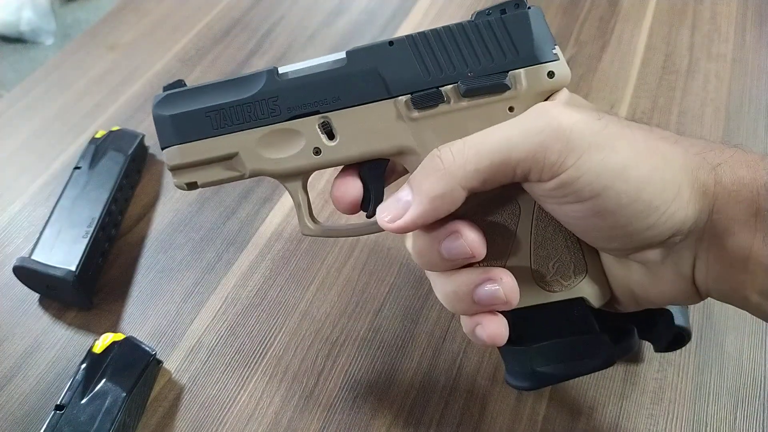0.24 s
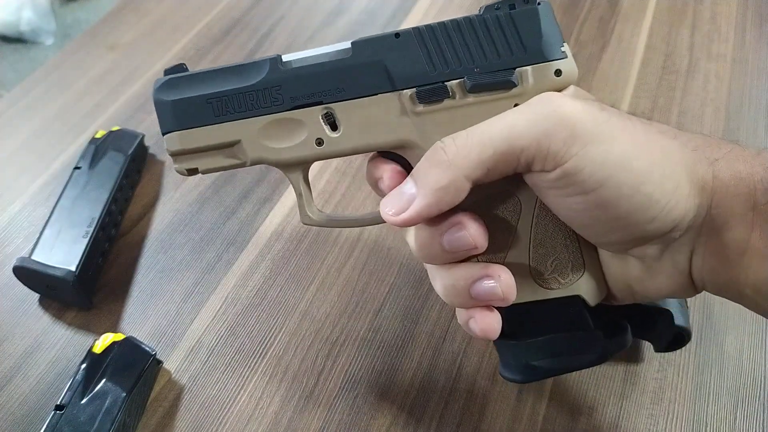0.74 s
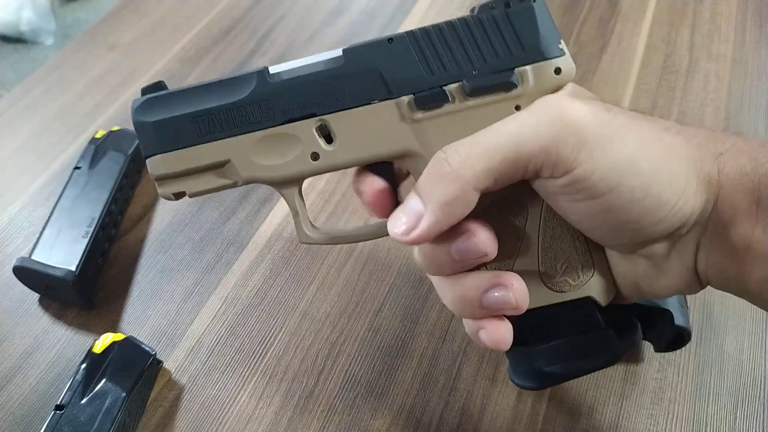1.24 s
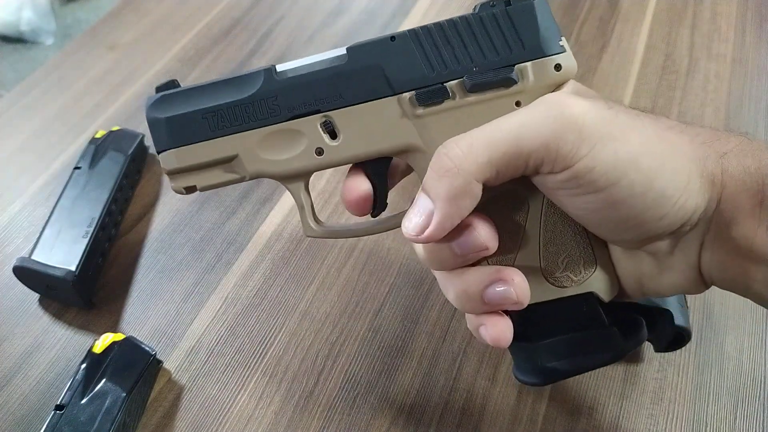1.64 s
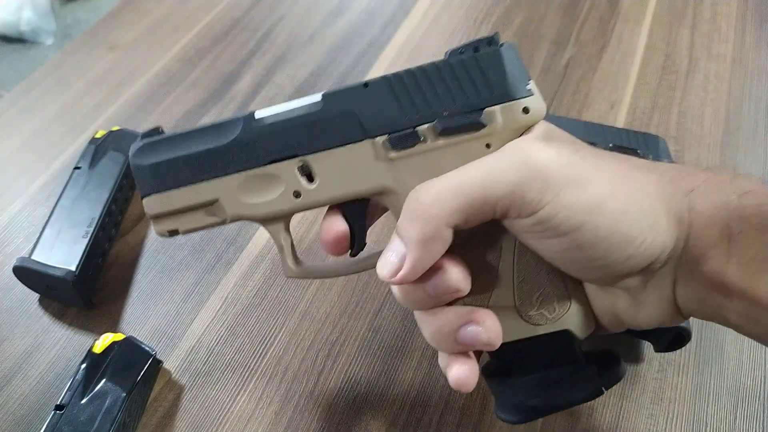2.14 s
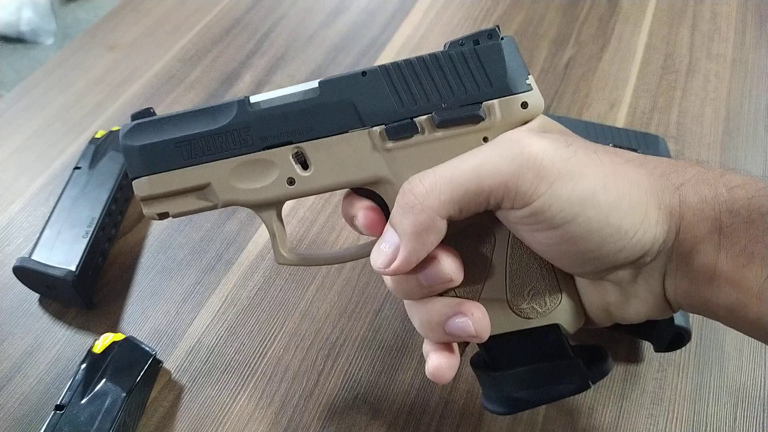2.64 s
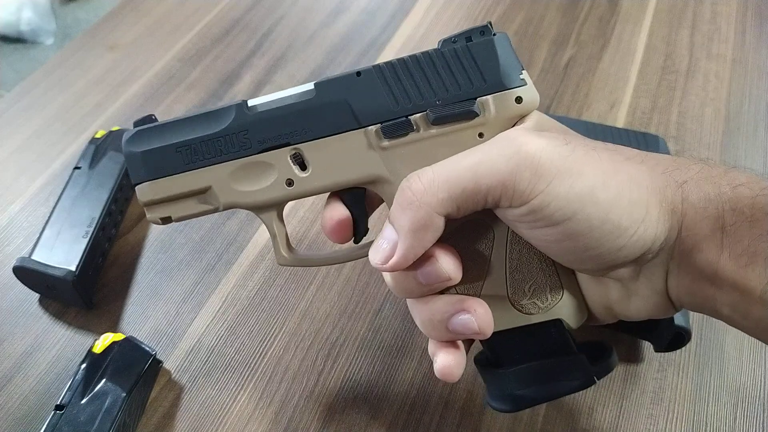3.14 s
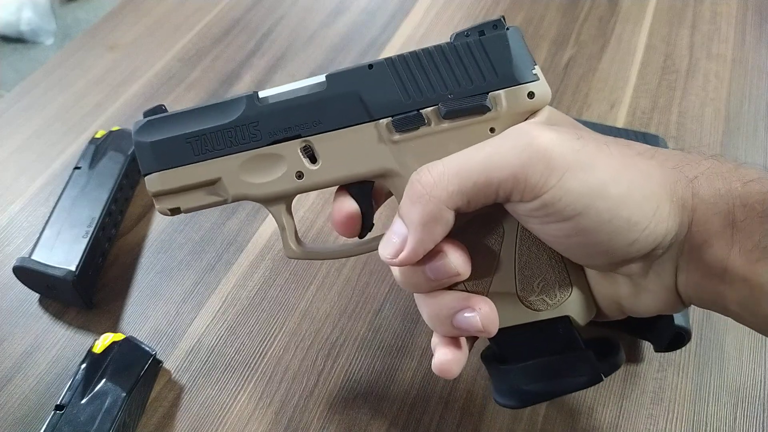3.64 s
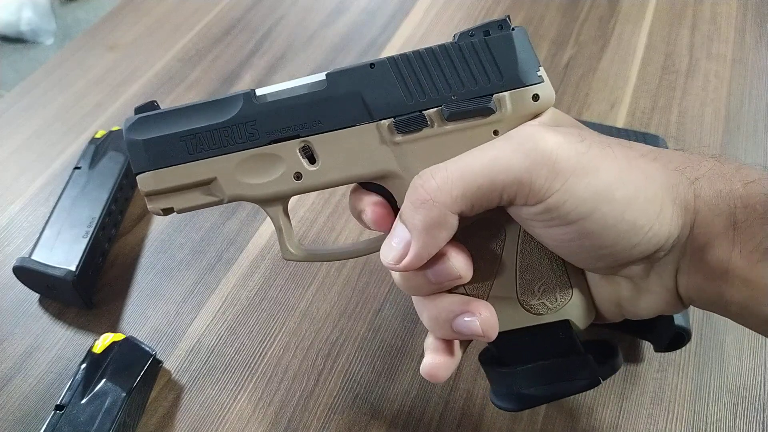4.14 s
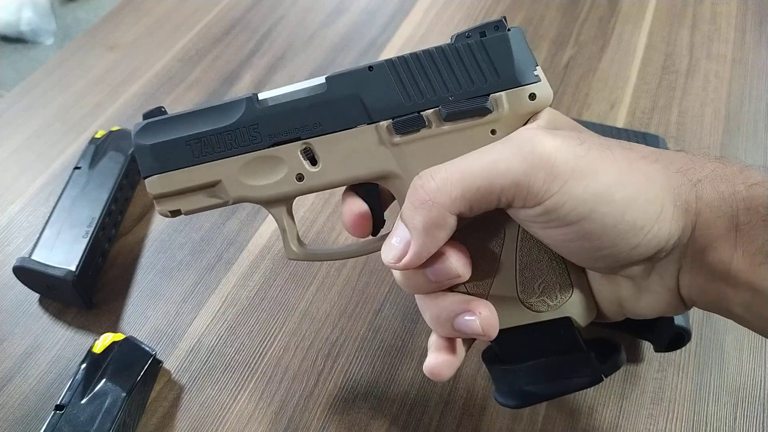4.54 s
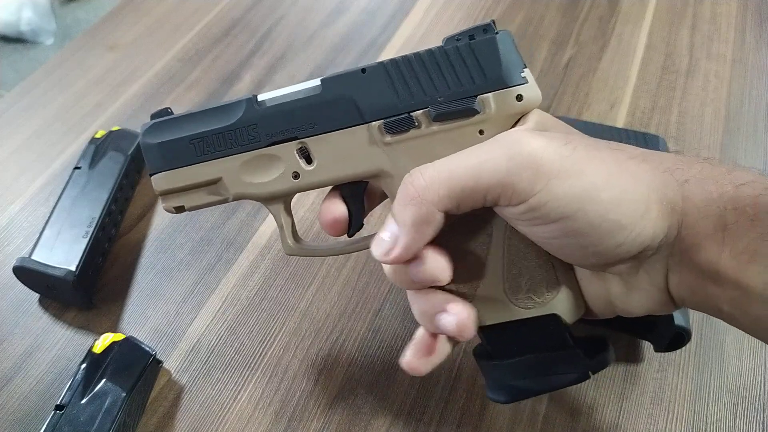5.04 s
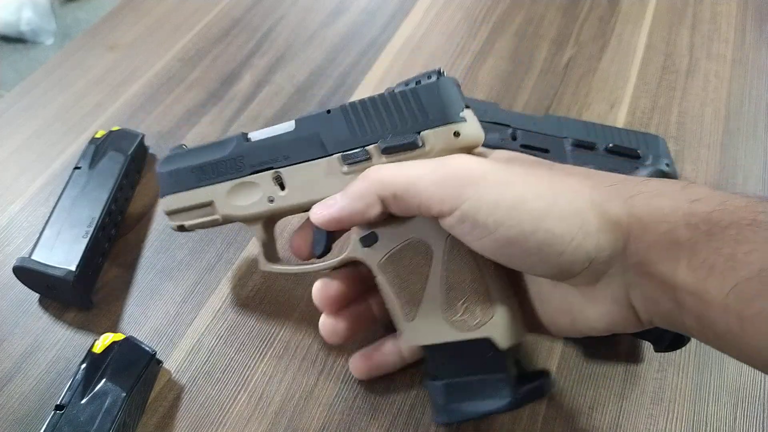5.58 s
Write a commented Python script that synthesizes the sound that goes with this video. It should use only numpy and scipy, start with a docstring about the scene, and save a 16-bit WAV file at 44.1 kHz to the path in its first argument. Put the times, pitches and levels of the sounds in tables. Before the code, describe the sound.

Loud, dry metal clacks come in pairs: striker slam, then bright trigger return. The first three pairs come quickly, the last two are spaced wider, with a longer pause before each closing click. Tiny mechanical ticks surround them. The close microphones catch high ringing steel, short hard-walled reverberation, faint ventilation hum and muted table knocks at the end.

```python
"""A bare room with a wooden table: a polymer-framed pistol is dry-fired in one hand, close to a phone with two
microphones. The striker slams forward and bounces (noise contacts, ringing steel, a frame thump), the trigger
clicks back on release and small parts tick (short coloured noise). A thin squeak goes with the first take-up,
and the grip finally knocks on the table (low modes). The room rings after each click as decaying noise bands,
and a separate, longer and differently coloured tail starts together with the fourth trigger reset; a soft hum
of air lies beneath."""
import sys
import numpy as np
from scipy import signal
from scipy.fft import rfft, irfft, next_fast_len
from scipy.io import wavfile
from scipy.ndimage import uniform_filter1d

SR = 44100
rng = np.random.default_rng(int(sys.argv[2]) if len(sys.argv) > 2 else 0)


def to_wav(sig):
    """Store sig (one row per channel, or 1-D mono) as 16-bit WAV at the path in sys.argv[1].

    Samples outside -1..1 are clipped; the rate is SR.
    """
    pcm = np.clip(np.atleast_2d(sig), -1, 1) * 32767
    pcm = np.round(pcm).astype(np.int16)
    wavfile.write(sys.argv[1], SR, pcm.T)  # frames by channels


N = 256220
SIZE = 8192  # samples in one short sound
HZ = np.maximum(np.arange(SIZE // 2 + 1) * SR / SIZE, 1)
T = np.arange(SIZE) / SR  # seconds
MIRROR = np.array([[1], [-1]])  # opposite signs at the left and right microphone


def amp(db):
    """Amplitude factor of a level in dB."""
    return 10 ** (np.asarray(db) / 20)


def along(table, hz):
    """A (Hz, value) table read on a log-frequency axis."""
    table_hz, value = np.transpose(table)
    return np.interp(np.log(hz), np.log(table_hz), value)


def shape(x, db, cycles):
    """Colours a short sound; each frequency comes a number of its own cycles late, so the lows trail."""
    late_s = 0.0022 + cycles / np.maximum(HZ, 150)
    turns = np.cumsum(late_s) * SR / SIZE  # the slope of the phase is the delay
    return irfft(rfft(x) * amp(db) * np.exp(-2j * np.pi * turns), SIZE)


def peak(x, db):
    """Scales a sound to a peak level in dB."""
    return x * amp(db) / np.abs(x).max()


def add(out, s, x):
    """Lays a sound into a track from a time in seconds."""
    i = max(int(s * SR), 0)
    out[:, i:i + x.shape[-1]] += x[..., :N - i]


def pan(db):
    """Left and right gains that differ by db."""
    return amp(db * MIRROR / 2)


def pair(alike):
    """Left and right noise that share a part; alike is their correlation."""
    mid, side = rng.standard_normal((2, SIZE))
    return np.sqrt((1 + alike) / 2) * mid + np.sqrt((1 - alike) / 2) * side * MIRROR


def burst(ms, rise_ms, fall_ms):
    """Envelope of one contact, starting at ms."""
    t = np.maximum(T * 1000 - ms, 0)
    return (1 - np.exp(-t / rise_ms)) * np.exp(-t / fall_ms)


def ring(modes, scatter_db):
    """Modes with fresh strengths and phases at each microphone; each pitch is scattered slightly every time."""
    hz, db, t60 = np.transpose(modes)[:, :, None]
    gain = rng.standard_normal((2, len(modes), 1))
    phase = rng.random((2, len(modes), 1))
    hz = hz * (1 + 0.0037 * rng.standard_normal(hz.shape))
    decay = amp(-60 * T / t60)
    tones = amp(db + scatter_db * gain) * decay * np.sin(2 * np.pi * (hz * T + phase))
    return tones.sum(axis=1)


def puff(db, ms):
    """What a click sends to the walls: a sharp edge and a weak burst, so every tail has a slightly uneven colour."""
    noise = burst(0, .05, ms) * pair(.5)
    noise = .4 * noise / np.sqrt((noise ** 2).sum(axis=1, keepdims=True))
    edge = T == 0
    return amp(db) * (noise + edge)


# Striker blows, close to the microphones. Each row: start in seconds, peak of the steel contact in dB, frame
# thump in dB, left minus right of the thump in dB, lead of the sear tick in ms, sear tick in dB.
STRIKES = [(0.7914, 4.5, -7, -6, 15, -38.5), (1.4162, 3.5, -13.5, -4.0, 18.2, -23.5),
           (1.9784, 3, -13.5, -8, 20.4, -22), (2.6702, 2.5, -10.5, -13.5, 30, -35),
           (4.1054, 2.5, -10.5, -10.5, 28.5, -32)]
STRIKE_ROOM_DB = -27  # sent to the walls, relative to the contact peak


def striker(dry, wet):
    """Steel on steel with rebounds, a falling thump of the frame and a slow sag of the level."""
    for s, db, thump_db, pan_db, *_ in STRIKES:
        add(dry, s - .003, steel(db) + frame(thump_db) * pan(pan_db))
        add(wet, s, puff(db + STRIKE_ROOM_DB, 1.5))
        add(dry, s + .011, slow_dip(thump_db - 5) * pan(pan_db))


# Contacts of the striker in each blow. Each row: time after the blow in ms, steel in dB, frame in dB.
REBOUNDS = [(0, 2, -9.5), (3.6, 4, -3), (9.5, -6, -1), (14.5, -7, -7), (20, -11.5, -20)]
# Colour of the steel contact. Each row: frequency in Hz, relative level in dB per Hz.
STRIKE_COLOUR = [(530, -33), (900, -7), (2110, -12), (3680, -12), (5630, -12), (6130, -19.5), (9610, -2),
                 (10500, -11.5), (12700, -34.5), (15200, -25), (16400, -40)]
# Ringing of slide and barrel. Each row: mode in Hz, relative level in dB, time to fall 60 dB in seconds.
STEEL = [(2401, -13, 0.1), (2670, -17.5, 0.049), (4130, -14.5, 0.044), (4690, -19.5, 0.019),
         (5570, -19, 0.055), (7000, -17.5, 0.1), (8600, -9, .07), (8590, -2.5, 0.052), (9500, -14, 0.078),
         (9410, -11.5, 0.061), (9660, -4.5, 0.16), (9800, -10, 0.066), (10790, -11.5, 0.039),
         (9990, -9, 0.035), (10970, -8, .07), (11500, -18.5, 0.0513)]


def steel(db):
    """Short noise contacts, coloured as steel, over the ringing modes of slide and barrel."""
    contact = sum(amp(steel_db) * burst(ms, 0.45, 1.15) for ms, steel_db, _ in REBOUNDS)
    crack = peak(shape(contact * pair(0.25), along(STRIKE_COLOUR, HZ), 5.7), db)
    fade_in = np.clip((T - .002) / 0.00376, 0, 1)
    return crack + amp(db - 11.5) * ring(STEEL, 1.5) * fade_in


# Colour of the hollow frame's thump. Each row: frequency in Hz, relative level in dB.
FRAME_COLOUR = [(60, -37), (110, -0.5), (170, -2.5), (350, -4.5), (700, -14), (1400, -17), (2800, -16.5),
                (5000, -36.5)]
GRIP_HZ, GRIP_T60_S = 158.9, 0.072


def frame(db):
    """Pushes on the frame trail into a falling thump; the grip swings on in the hand after the rebounds."""
    push = sum(amp(frame_db) * burst(ms, 0.026, 0.062) for ms, _, frame_db in REBOUNDS)
    push = push * (1 + 1.31 * pair(.1))
    thump = peak(shape(-push, along(FRAME_COLOUR, HZ), 2.4), db)
    after = np.maximum(T - .022, 0)
    swing = amp(-60 * after / GRIP_T60_S) * np.sin(2 * np.pi * GRIP_HZ * after)
    return thump + amp(db - 4.5) * swing


def slow_dip(db):
    """Shortly after the blow the level sags slowly, then swings back."""
    t = np.arange(SR // 2) / SR
    dip = (1 - np.exp(-t / 0.0033)) * np.exp(-(t / 0.04) ** 2)
    highpass = signal.butter(2, 2.05, "high", fs=SR, output="sos")
    return -peak(signal.sosfilt(highpass, dip), db)


# Trigger resets, in the hand. Each row: start in seconds, peak of the snap in dB, lows relative in dB,
# frame knock in dB, left minus right in dB.
RESETS = [(1.1128, 1.5, 0.5, -24, 0), (1.664, 1.4, 0.5, -20, -1.5), (2.167, 2, -7, -15.5, -1),
          (3.3877, 0.3, -4, -19.5, -3.5), (4.9252, 1.15, -3, -19, -3)]
RESET_ROOM_DB = -37.5  # sent to the walls, relative to the snap peak


def resets(dry, wet):
    """The trigger snaps back loudly on release."""
    for s, db, low_db, knock_db, pan_db in RESETS:
        add(dry, s - .003, click(db, low_db, knock_db, 1.84, -20.5) * pan(pan_db))
        add(wet, s, puff(db + RESET_ROOM_DB, 1.3))


# Ticks of small trigger parts; the rows at 5.581 and 5.685 s are the click of the grip on the table.
# Each row: start in seconds, peak of the snap in dB, lows relative in dB, frame knock relative to the snap in dB.
TICKS = [(0.1579, -22, -7, -17), (0.469, -54, -2, -16), (0.57, -32, 7, -11), (0.634, -28.5, 17, -30),
         (1.0733, -18.5, 10.5, -13.5), (1.099, -19, 5, -32), (1.235, -28.5, 8, -5), (1.301, -37.5, 15, -15),
         (1.641, -19.5, 8, -14), (1.655, -18.5, 5, -22), (1.772, -32, 9, -10), (1.845, -35, 15, -15),
         (2.148, -13, 11, -12), (2.287, -34, 12, 0), (2.3613, -32, 9, -10), (2.5682, -35.5, 17, -21),
         (2.9733, -39, -8, -16), (3.0708, -20.5, 9, -13), (3.22, -19.5, -2.5, -26), (3.66, -35, 8, -6.5),
         (3.897, -42, 19.5, -4), (4.091, -36.5, 9, -25), (4.5665, -44, 11, -11.5),
         (4.589, -41.5, 13.5, -12), (4.9076, -19.5, -3, -20.5), (5.3676, -54, -8.5, -20),
         (5.581, -48, 3, -5.5), (5.685, -49.5, 2, -10)]
# the trigger knocks the frame once more after each blow
SETTLE_MS, SETTLE_DB, SETTLE_KNOCK_DB = 48.5, -33, -25.5


def ticks(dry, wet):
    """Faint ticks of the trigger parts and of the grip, the sear slipping before each blow and a knock after it."""
    for s, db, low_db, knock_db in TICKS:
        tick(dry, wet, s, db, low_db, db + knock_db)
    for s, *_, lead_ms, db in STRIKES:
        tick(dry, wet, s - lead_ms / 1000, db, 7, db - 22)
        tick(dry, wet, s + SETTLE_MS / 1000, SETTLE_DB, 4, SETTLE_KNOCK_DB)


TICK_PAN_DB, TICK_ROOM_DB = -2, -34  # left minus right; sent to the walls, relative to the snap peak


def tick(dry, wet, s, db, low_db, knock_db):
    """One faint click and its share of the room."""
    add(dry, s - .003, click(db, low_db, knock_db, 2.1, -16) * pan(TICK_PAN_DB))
    add(wet, s, puff(db + TICK_ROOM_DB, 1.5))


# Colour of a trigger snap. Each row: frequency in Hz, relative level in dB per Hz.
RESET_COLOUR = [(710, -44.5), (1200, -21), (1840, -12), (4090, -11), (6190, -4.5), (7460, -9), (7970, -6.5),
                (9590, -0.5), (11600, -14.5), (15000, -22.5), (16400, -30.5)]
# Modes of the knocked frame. Each row: mode in Hz, relative level in dB, time to fall 60 dB in seconds.
FRAME_KNOCK = [(825, 5, 0.026), (1440, -9, .02)]


def click(db, low_db, knock_db, fall_ms, echo_db):
    """A small part snaps home and knocks the hollow frame; the table top returns the snap a few ms later."""
    tilt_db = low_db * np.clip(np.log2(6000 / HZ) / 1.28, 0, 1)
    echo = burst(8.5, 0.25, 2.8) + .5 * burst(16, 0.56, 3.9)
    contact = burst(0, 0.61, fall_ms) + amp(echo_db) * echo
    snap = peak(shape(contact * pair(.4), along(RESET_COLOUR, HZ) + tilt_db, 3.1), db)
    fade_in = np.clip((T - .003) / 0.0022, 0, 1)
    knock = ring(FRAME_KNOCK, 0.98)[0] * fade_in  # the same at both microphones
    return snap + amp(knock_db) * knock


# Grip knocking on the table near the phone. Each row: start in seconds, peak in dB.
KNOCKS = [(5.581, -35), (5.61, -43), (5.655, -35), (5.689, -39), (5.723, -43.5)]
# Modes of the table top. Each row: mode in Hz, relative level in dB, time to fall 60 dB in seconds.
TABLE = [(170, -4.5, 0.16), (250, -2, 0.2), (397, 1.5, 0.064), (898, -11, 0.021)]


def knocks(dry):
    """Soft plastic on wood: the table's low modes with a rounded onset."""
    for s, db in KNOCKS:
        onset = 1 - np.exp(-T / 0.0012)
        add(dry, s, peak(ring(TABLE, 1.9).mean(axis=0) * onset, db))


# Pitch of the squeak as the trigger is first taken up; only its second and third partials sound.
# Each row: time in seconds, fundamental in Hz.
SQUEAK = [(.2, 3250), (.24, 3500), (.29, 3530), (.325, 3800), (.395, 3450), (.43, 3500), (.465, 3240),
          (.495, 3190), (.55, 3720), (.61, 3950), (.685, 4270), (.72, 3720), (.785, 2980)]
THIRD_DB, SQUEAK_FADE_S = -70, .03  # level before the hoarseness
THIN_ABOVE_HZ, FALL_DB_PER_KHZ = 10700, 11  # the third partial thins out above this
SECOND_DB, SECOND_PEAK_S, SECOND_WIDTH_S = -68, .67, .08  # the second partial swells near the end


def squeak():
    """A wavering, slightly hoarse whistle of two partials."""
    s, hz = np.transpose(SQUEAK)
    t = np.arange(N) / SR
    pitch = uniform_filter1d(np.interp(t, s, hz), SR // 60)
    phase = 2 * np.pi * np.cumsum(pitch) / SR
    hoarse = 1 + 6.0 * uniform_filter1d(rng.standard_normal((2, N)), 150)
    fade = np.clip(np.minimum(t - s[0], s[-1] - t) / SQUEAK_FADE_S, 0, 1)
    above_khz = np.maximum(3 * pitch - THIN_ABOVE_HZ, 0) / 1000
    third = amp(THIRD_DB - FALL_DB_PER_KHZ * above_khz) * np.sin(3 * phase)
    swell = np.exp(-((t - SECOND_PEAK_S) / SECOND_WIDTH_S) ** 2)
    second = amp(SECOND_DB) * swell * np.sin(2 * phase)
    return hoarse * fade * (third + second)


# Colour of the separate, longer tail that starts with the fourth trigger reset. Each row: frequency in Hz, #
# relative level in dB per Hz.
TAIL_COLOUR = [(180, -52), (300, -28), (407, -1), (448, -21), (571, -21), (629, -17.5), (1250, -12.5),
               (1430, -3.5), (2280, -19.5), (2430, -11.5), (3460, -13.5), (4330, -7), (4840, -7),
               (8780, -6), (13500, -21), (14500, -45)]
TAIL_S, TAIL_DB = 3.39, -28  # start; level of the impulse sent to the walls


def second_tail():
    """A separate, longer and differently coloured room tail that starts together with the fourth trigger reset,
    set off by one impulse."""
    impulse = np.zeros((2, N))
    add(impulse, TAIL_S, amp(TAIL_DB) * np.ones(1))
    return room(impulse, TAIL_COLOUR)


# Colour of the room's answer to the clicks. Each row: frequency in Hz, relative level in dB per Hz.
ROOM_COLOUR = [(350, -59), (600, -30), (791, -10.5), (974, -26), (1060, -19), (1560, -20.5), (2430, -11),
               (5420, -13), (8150, -10), (8700, -1.5), (9560, 0.5), (11100, -7), (13500, -21), (14100, -35),
               (15500, -34), (16400, -92.5)]
# Reverberation of the bare room. Each row: frequency in Hz, time to fall 60 dB in seconds.
ROOM_T60 = [(500, 0.74), (1500, 0.77), (4000, 0.74), (9000, 0.64), (14000, 0.57)]


def room(wet, colour):
    """Dense reflections that build up in a few ms and die away band by band."""
    t = np.arange(SR) / SR
    tail = sum(x * amp(-60 * t / along(ROOM_T60, hz)) for hz, x in bands(SR, colour))
    build_up = 1 - np.exp(-t / 0.0065)
    early = 1 + 1.7 * np.exp(-t / 0.016)
    tail = tail * build_up * early
    return signal.fftconvolve(wet, tail / tail[:, :SR // 10].std(), axes=1)[:, :N]


# Colour of the air at the phone. Each row: frequency in Hz, relative level in dB per Hz.
AIR = [(25, -21.5), (45, -6), (58, 1.5), (85, -24), (120, -4.5), (150, -8), (290, -10.5), (500, -14),
       (650, -22.5), (1050, -26), (2400, -28), (3300, -36.5), (6300, -41), (8500, -38.5), (10500, -40.5),
       (13000, -49.5), (16000, -53.5)]
# Likeness of the air at the two microphones. Each row: frequency in Hz, left-right correlation.
AIR_ALIKE = [(50, 0.93), (300, 0.89), (1500, 0.16), (8000, 0.061)]
AIR_DB = -51.5  # RMS of the two channels' mean


def air():
    """Ventilation and microphone hiss; each band wanders a little, the lows most."""
    out = 0
    for hz, (mid, side) in bands(next_fast_len(N), AIR):
        alike = along(AIR_ALIKE, hz)
        wander = np.interp(np.arange(N), np.linspace(0, N, 24), rng.standard_normal(24))
        both = np.sqrt(1 + alike) * mid[:N] + np.sqrt(1 - alike) * side[:N] * MIRROR
        out = out + both * amp((0.75 + 60 / hz) * wander)
    return out * amp(AIR_DB) / out.mean(axis=0).std()


def bands(size, table):
    """Overlapping third-octave noise bands, two channels each, at the levels of a spectrum."""
    hz = np.maximum(np.arange(size // 2 + 1) * SR / size, 1)
    noise = rfft(rng.standard_normal((2, size))) * amp(along(table, hz))
    for mid in 25 * 2 ** (np.arange(29) / 3):
        weight = np.clip(1 - np.abs(3 * np.log2(hz / mid)), 0, 1)
        yield mid, irfft(noise * weight, size)


def scene():
    """The pistol and table up close, the room's answer and the air."""
    dry, wet = np.zeros((2, 2, N))
    striker(dry, wet)
    resets(dry, wet)
    ticks(dry, wet)
    knocks(dry)
    return dry + squeak() + second_tail() + room(wet, ROOM_COLOUR) + air()


TOP_HZ = 16100


def record(dry):
    """The phone rounds the loudest peaks and cuts the top."""
    rounded = np.tanh(1.046 * dry) / 1.131
    lowpass = signal.ellip(8, .2, 70, TOP_HZ, fs=SR, output="sos")
    return signal.sosfilt(lowpass, rounded)


dry = scene()
out = record(dry)
to_wav(out)
```